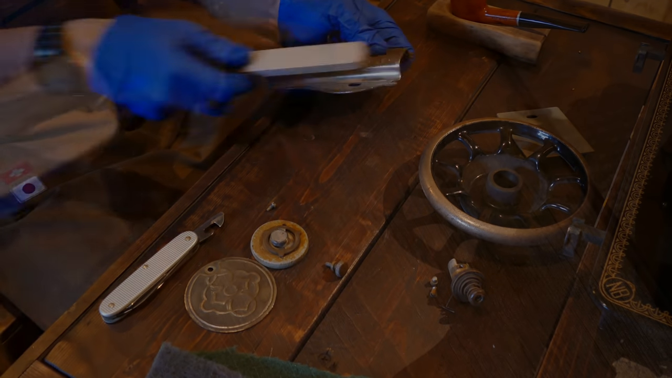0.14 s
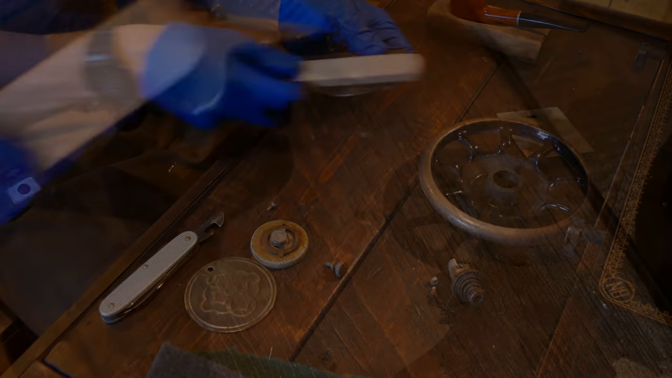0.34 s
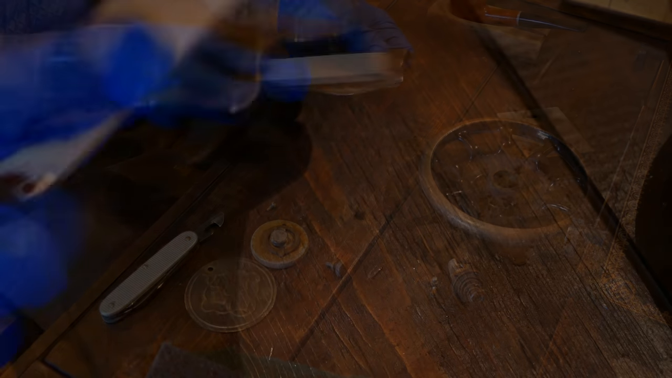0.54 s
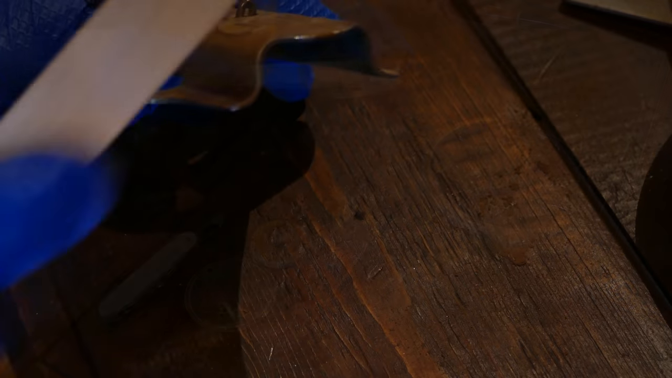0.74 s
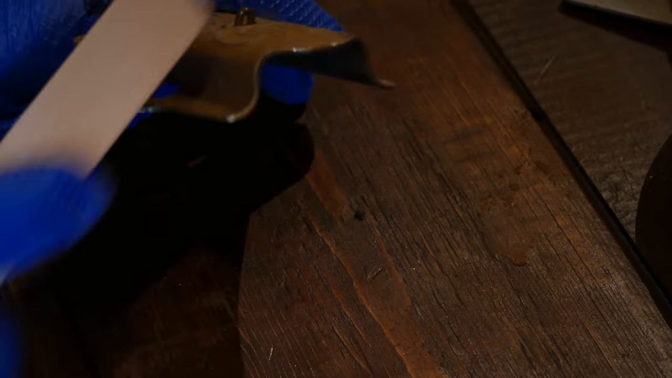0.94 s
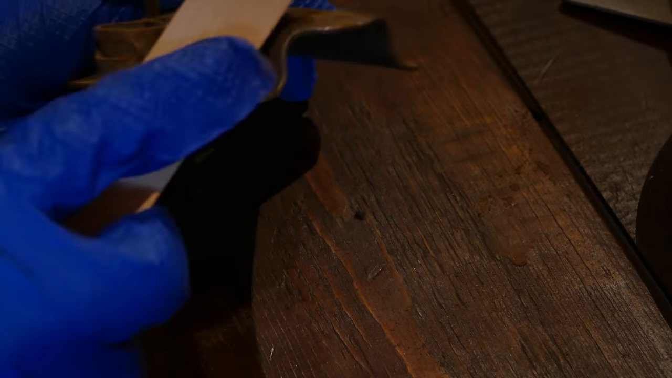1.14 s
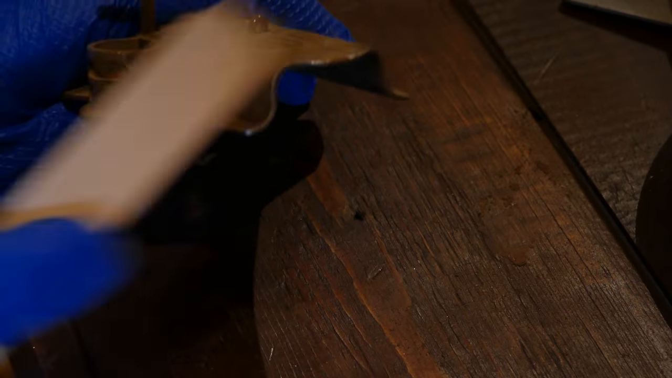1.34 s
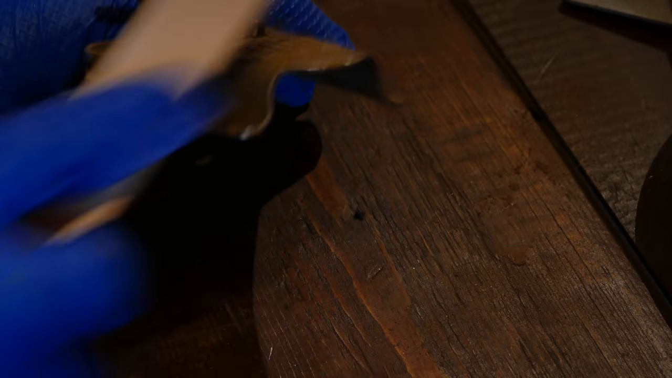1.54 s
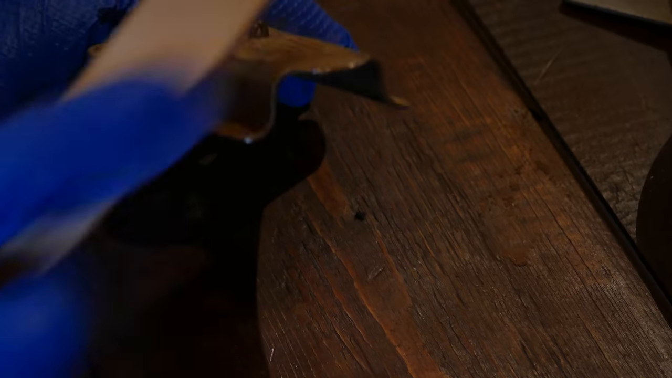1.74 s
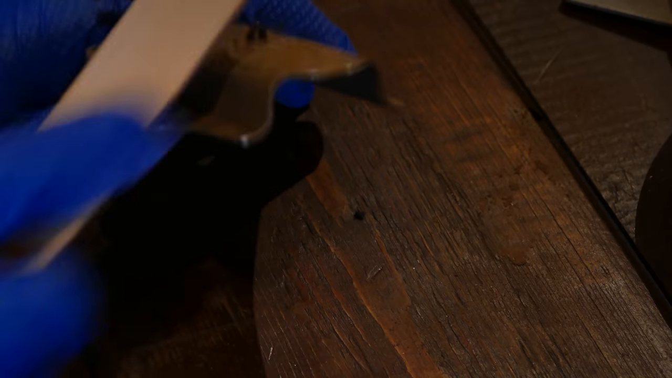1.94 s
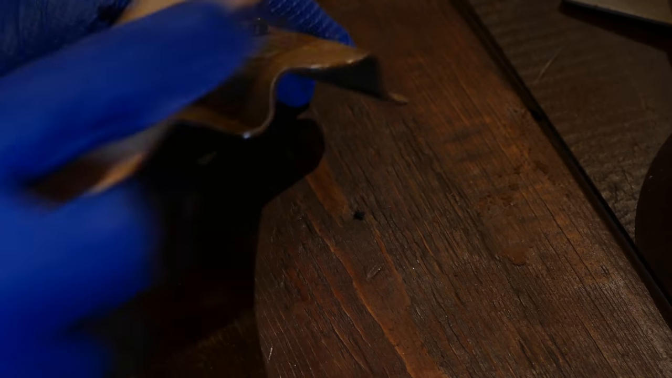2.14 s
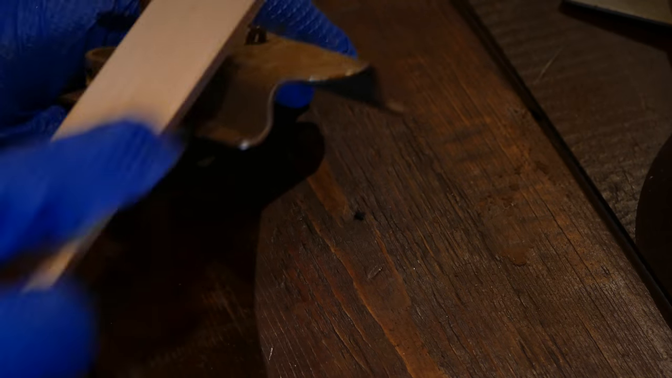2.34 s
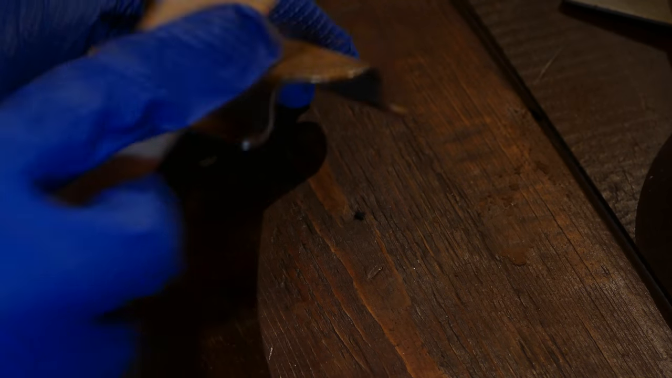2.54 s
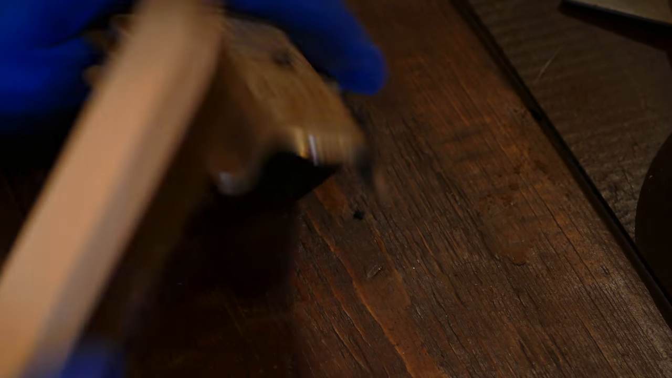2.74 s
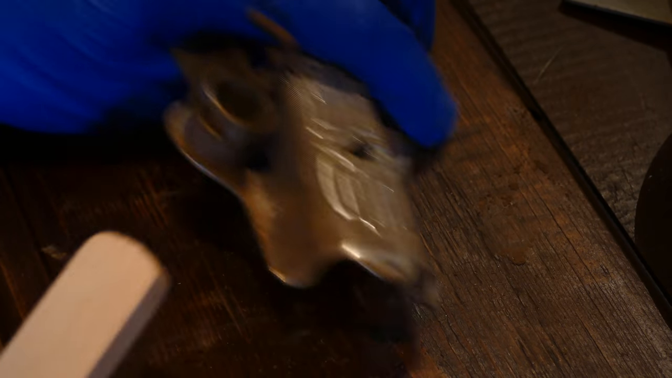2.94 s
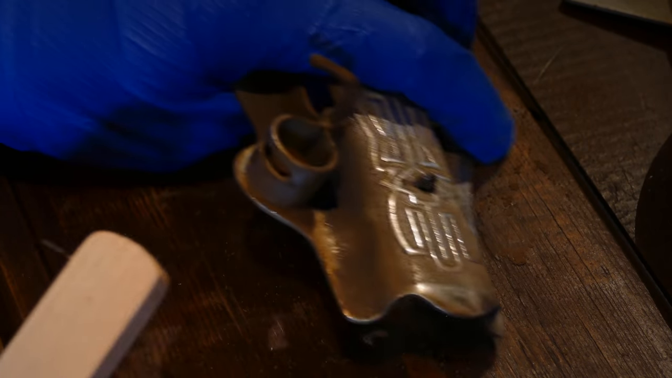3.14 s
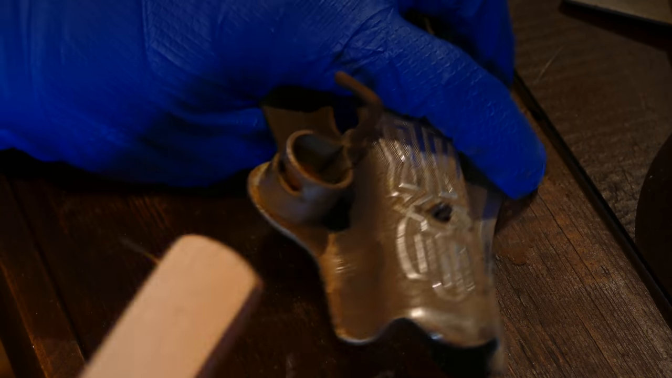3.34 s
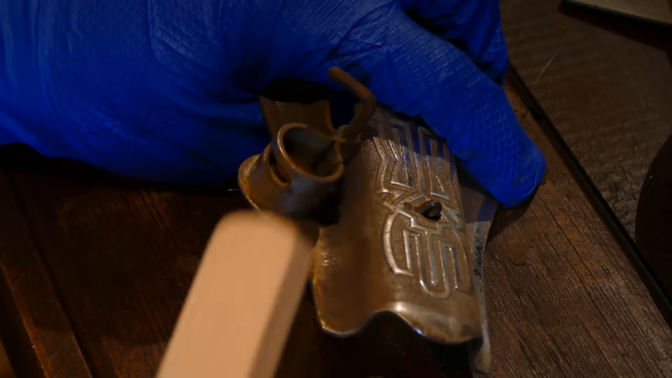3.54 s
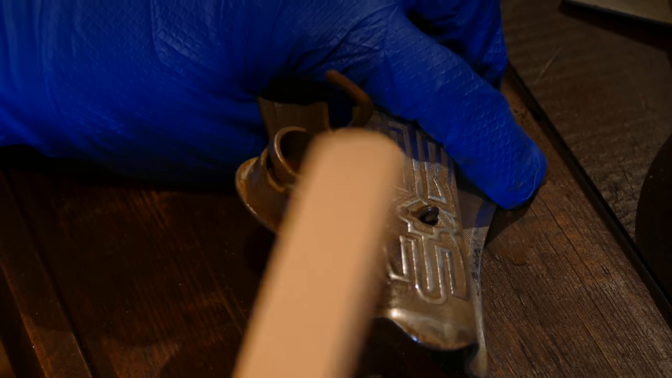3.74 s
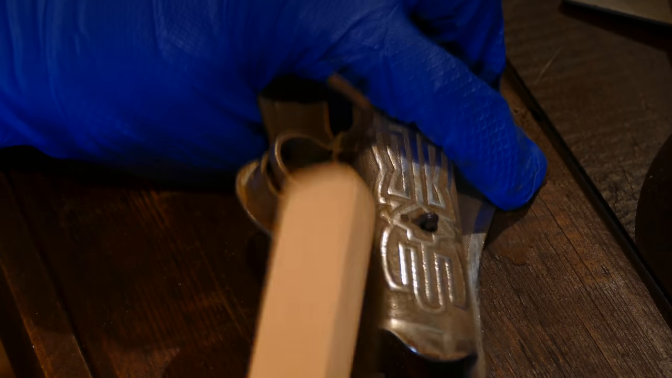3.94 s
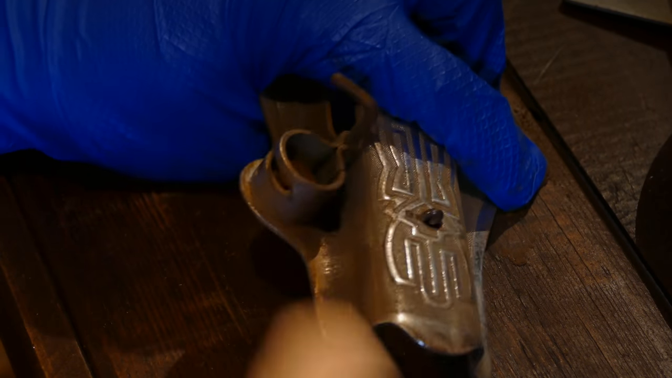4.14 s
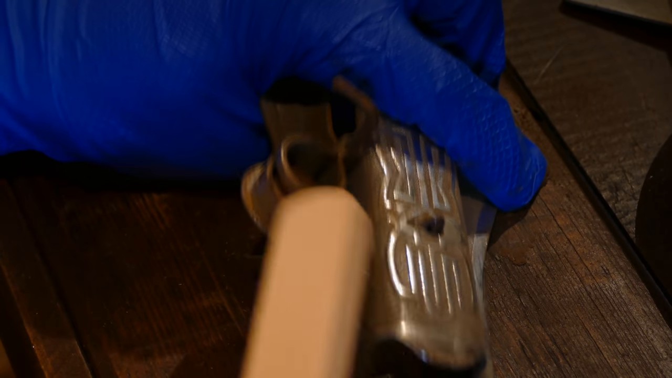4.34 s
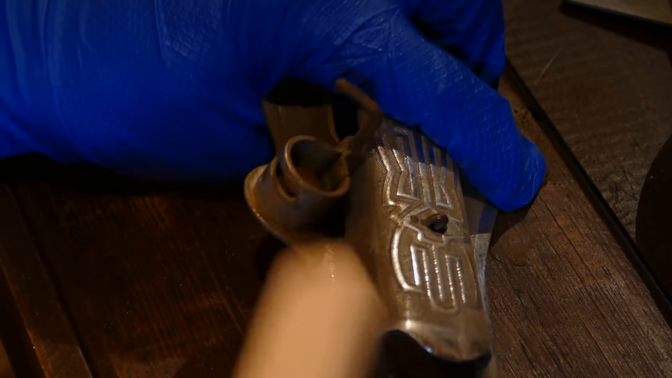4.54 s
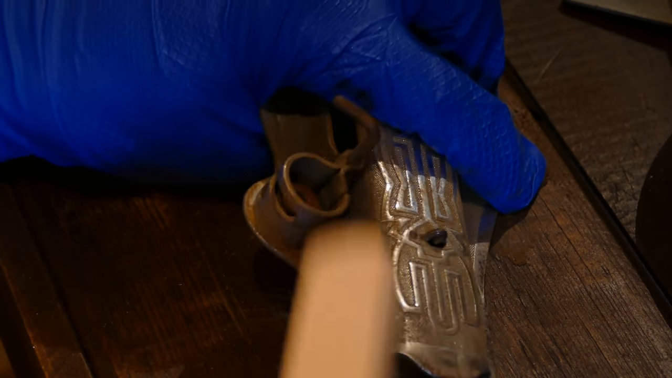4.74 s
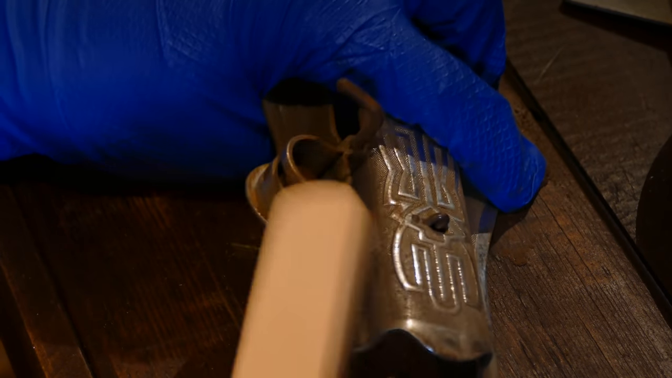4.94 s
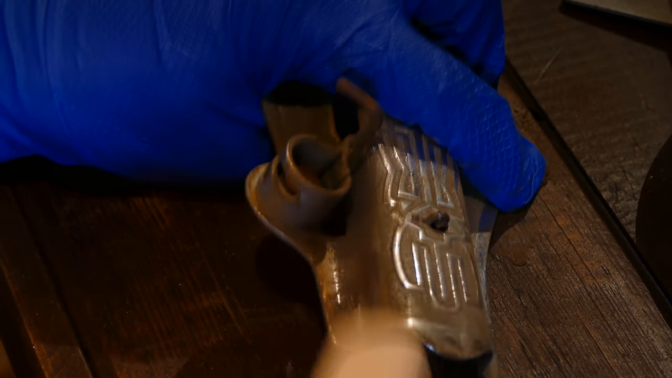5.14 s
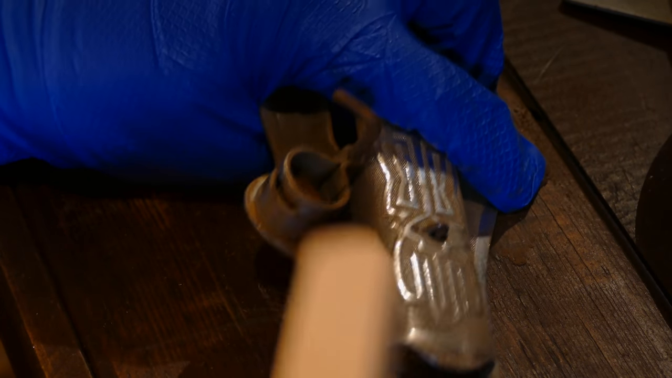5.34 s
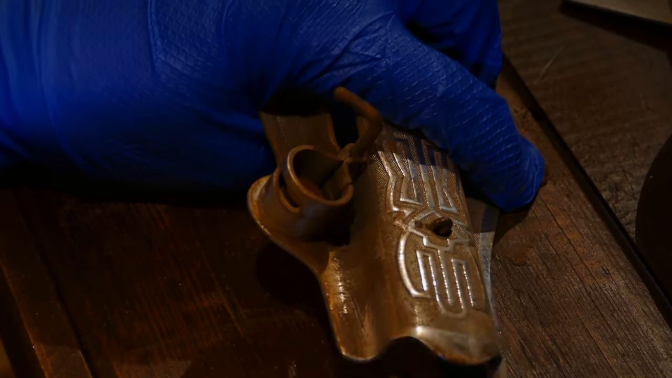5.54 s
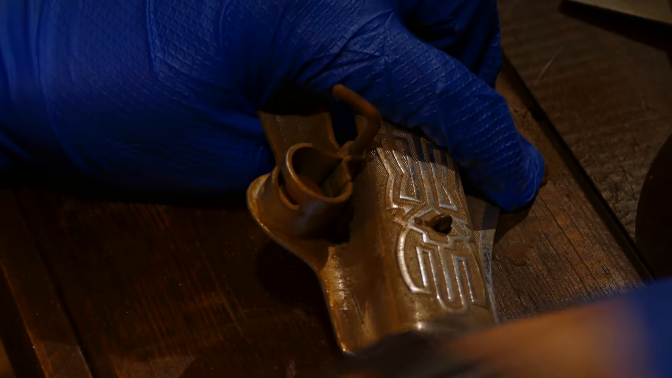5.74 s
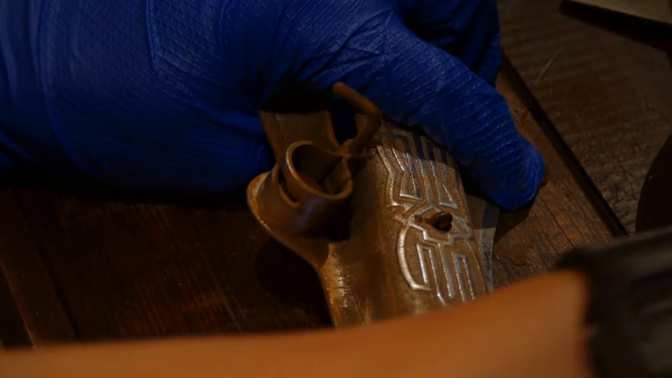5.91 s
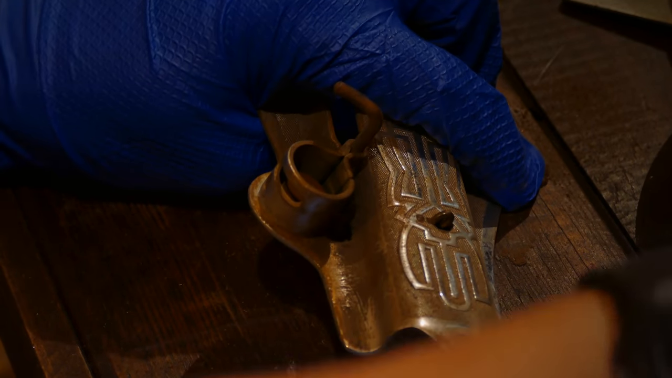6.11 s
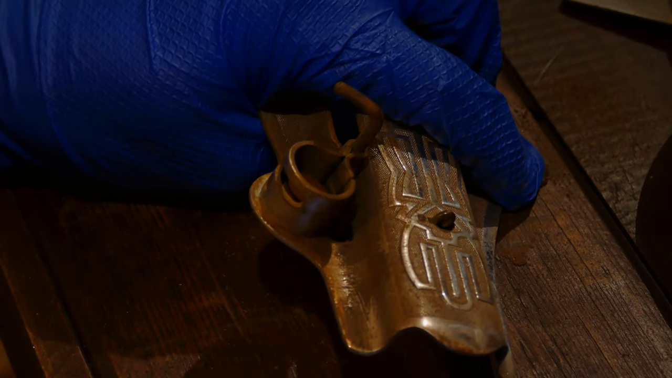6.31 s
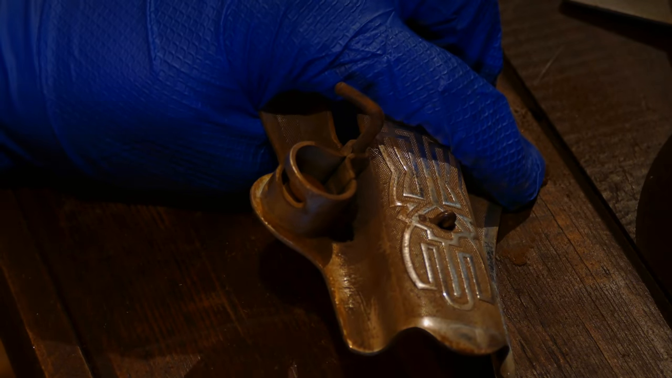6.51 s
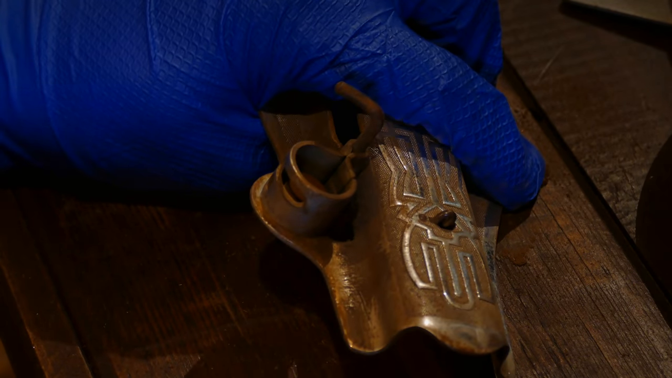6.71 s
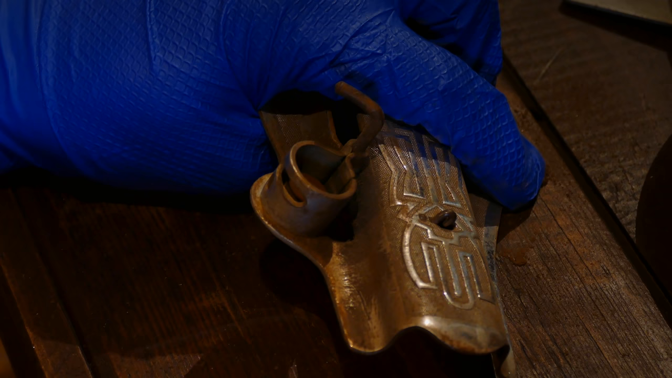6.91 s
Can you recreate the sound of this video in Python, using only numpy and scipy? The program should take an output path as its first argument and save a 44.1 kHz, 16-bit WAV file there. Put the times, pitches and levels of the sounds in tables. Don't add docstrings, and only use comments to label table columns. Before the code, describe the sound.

A wire brush scrubs a small metal cover in short raspy strokes, rubber gloves rustle, then a wooden handle knocks down loudly and small tools tick.

```python
import sys
import numpy as np
from scipy import signal
from scipy.fft import rfft, irfft, next_fast_len
from scipy.io import wavfile
from scipy.ndimage import uniform_filter1d

SR = 44100
rng = np.random.default_rng(int(sys.argv[2]) if len(sys.argv) > 2 else 0)


def persist_wave(psi):
    counts = np.round(np.clip(psi, -1, 1) * 32767).astype(np.int16)
    wavfile.write(sys.argv[1], SR, np.atleast_2d(counts).T)


def linear_from_db(decibels):
    return 10 ** (np.asarray(decibels, float) / 20)


N = 311787
T = np.arange(N) / SR
DECAY = np.log(1000)


def colour(x, points):
    size = next_fast_len(len(x))
    hz, db = np.transpose(points)
    f = np.log(np.arange(size // 2 + 1) * SR / size + 1)
    gain = linear_from_db(np.interp(f, np.log(hz), db))
    return irfft(rfft(x, size) * gain, size)[:len(x)]


def unit(x):
    return x / np.sqrt(np.mean(x ** 2))


def band(x, hz, width):
    return signal.lfilter(*signal.iirpeak(hz, hz / width, SR), x)


def cut(x, hz, kind):
    return signal.sosfilt(signal.butter(4, hz, kind, fs=SR, output="sos"), x)


def walk(rate):
    k = int(SR / rate)
    held = np.repeat(rng.standard_normal(N // k + 1), k)
    return 1.2 * uniform_filter1d(held, k)[:N]


def slips(rate, scatter_db):
    scatter = linear_from_db(scatter_db * np.minimum(rng.exponential(size=N), 3))
    size = scatter * rng.standard_normal(N)
    return unit(size * (rng.random(N) < rate / SR))


def ring(modes, rise, clatter):
    hz, db, t60 = np.transpose(modes)[:, :, None]
    t = T[:SR // (3 if t60.max() > .12 else 9)]
    fade = linear_from_db(db) * np.exp(-DECAY * t / t60)
    noises = rng.standard_normal(fade.shape)
    dense = np.array([unit(band(band(n, f, 0.71 * f), f, 0.71 * f)) for n, f in zip(noises, hz[:, 0])])
    onset = 1 - np.exp(-(t / rise) ** 2)
    y = (fade * (np.sin(2 * np.pi * hz * t) + clatter * dense)).sum(axis=0) * onset
    return y / np.abs(y).max()


def add(out, s, db, y):
    i = int(s * SR)
    out[i:i + len(y)] += linear_from_db(db) * y[:N - i]


def swells(rows):
    s, rise, fall, db = np.transpose(rows)[:, :, None]
    t = T[::64]
    away = np.maximum((s - t) / np.maximum(rise, 1e-3), (t - s) / np.maximum(fall, 1e-3))
    level = linear_from_db(db - 19 * np.minimum(away, 5))
    return np.interp(T, t, np.sqrt((level ** 2).sum(axis=0)))


# frequency in Hz, level in dB per Hz.
NOISE_MID = [(25, -22), (100, -10), (250, -2), (600, 0), (1200, -3), (2100, -5), (3000, -10), (5000, -13),
             (8000, -15), (14500, -11), (16000, -14)]
# frequency in Hz, level in dB per Hz.
NOISE_SIDE = [(25, -16), (150, -5), (400, -0.5), (1000, -3.5), (2500, -9.5), (8000, -13), (16000, -15)]
# loudest moment in seconds, level in dB.
RUMBLE = [(.05, -71), (.45, -63.5), (1.12, -60.5), (1.69, -62.5), (2.1, -65), (2.6, -71), (4.09, -63.5),
          (4.94, -63), (6.14, -64.5), (7.0, -70)]
# start in seconds, level in dB, frequency in Hz, decay T60 in seconds.
BOOMS = [(0.929, -50.5, 99, 0.14), (1.70, -50, 86.3, 0.58), (1.701, -40, 198, 0.17), (4.9, -56, 90.6, 0.2),
         (6.091, -42.5, 180, .25), (2.17, -59, 191, 0.22), (2.42, -55.5, 170, .2), (2.79, -52, 202, 0.19),
         (3.97, -46, 171, 0.21)]


def room_noise():
    mid = unit(colour(rng.standard_normal(N), NOISE_MID))
    side = unit(colour(rng.standard_normal(N), NOISE_SIDE)) * linear_from_db(-5.5)
    swell = linear_from_db(-57 + 0.83 * walk(2.5))
    rumble = band(rng.standard_normal(N), 112, 82) + 1.34 * band(rng.standard_normal(N), 192, 25)
    rise_s, fall_s, building_db = .4, 0.44, -77.5
    rumble = unit(rumble) * (linear_from_db(building_db) + swells([(s, rise_s, fall_s, db) for s, db in RUMBLE]))
    for s, db, hz, t60 in BOOMS:
        add(rumble, s, db, ring([(hz, 0, t60)], rise=0.011, clatter=0.2))
    return np.array([mid + side, mid - side]) * swell + rumble


def strokes(rows):
    bend_db, bend_s = -10, 0.046
    catch_db, catch_s = -1.5, 0.0046
    lift_db_per_s = -580
    tips_db = -17, -3
    t = T[::32]
    scrub, tips = np.zeros((2, len(t)))
    for lands, full, lifts, full_db, lift_db in rows:
        turning = scrub[max(int(lands * SR) // 32, 0)] > 1e-3
        bend = 0 if turning else np.clip((full - lands) / bend_s, 0, 1.3)
        bent_db = full_db + bend_db * bend
        db = np.interp(t, (lands, full, lifts), (bent_db, full_db, lift_db))
        db = db + lift_db_per_s * np.clip(t - lifts, 0, .25)
        catch = linear_from_db(bent_db - bend_db + catch_db) * np.exp(-np.clip(t - lands, 0, .1) / catch_s)
        gain = linear_from_db(db) + catch
        scrub = np.where(t >= lands, gain, scrub)
        tips = np.where(t >= lands, gain * linear_from_db(np.interp(t, (lands, lifts), tips_db)), tips)
    return np.interp(T, t, scrub), np.interp(T, t, tips)


# landing, full speed and lift in seconds,
# level at full speed in dB, level at lift in dB.
HELD_STROKES = [
    (-.1, -.05, 0.014, -44, -47.5),
    (.214, .29, .376, -39.5, -34),
    (.377, .47, 0.54, -48, -39),
    (.92, 1.02, 1.194, -39, -43),
    (1.472, 1.514, 1.637, -40, -39.5),
    (1.911, 1.94, 2.088, -42.5, -41),
    (2.342, 2.37, 2.535, -46, -41),
]
PRESSED_STROKES = [
    (3.968, 4.016, 4.097, -44, -40),
    (4.364, 4.428, 4.508, -42.5, -40),
    (4.712, 4.76, 4.85, -45, -37.5),
    (5.032, 5.07, 5.165, -47.5, -41.5),
    (5.33, 5.385, 5.415, -44, -44),
]
# loudest moment, rise and fall in seconds, level in dB.
HELD_HUM = [(.39, .02, 0.51, -54.5), (.96, .03, .08, -54), (1.128, 0.2, 0.16, -45.5),
            (1.625, 0.046, 0.045, -47), (2.07, 0.09, .07, -49), (2.48, .08, 0.085, -46)]
PRESSED_HUM = [(3.975, .02, 0.18, -42), (4.369, 0.011, 0.23, -46), (4.726, .02, 0.18, -38.5),
               (4.862, .08, 0.068, -45), (5.04, 0.019, 0.22, -44.5), (5.34, 0.022, 0.14, -46)]
# frequency in Hz, bandwidth in Hz, level in dB.
HELD_PLATE = [(2065, 170, -0.5), (2770, 380, -5.5), (3500, 690, 1), (4310, 950, 0.5), (5360, 410, -2),
              (6440, 450, -3.5), (7440, 390, -3), (8600, 300, -9), (11000, 250, -16.5)]
PRESSED_PLATE = [(1880, 150, 4.5), (2880, 220, 3.5), (3420, 260, 6.5), (4730, 1400, 6), (6500, 400, -11),
                 (7300, 500, 3), (8640, 270, -3)]
# frequency in Hz, level in dB per Hz.
BRISTLE = [(88, -40), (150, 7.5), (270, -10), (396, -9), (494, -2.5), (1990, -6), (2870, -20.5),
           (3580, -4.5), (12000, -14.5), (15600, -44), (22000, -120)]


def brush(rows, pushes, plate, bench_hz, ring_db, lowest_db):
    slip = slips(14000, scatter_db=1.0)
    (low_hz, low_width, _), *upper = plate
    rings = sum(linear_from_db(db + 4.9 * walk(14)) * unit(band(slip, hz, w)) for hz, w, db in upper)
    scrub = unit(unit(colour(slip, BRISTLE)) + linear_from_db(ring_db) * unit(rings)) * linear_from_db(2.3 * walk(45))
    tips = unit(cut(slips(12000, scatter_db=2.0), 9000, "high")) * linear_from_db(-2.0)
    hum = unit(band(band(slips(1500, scatter_db=1.0), bench_hz, 110), bench_hz, 143))
    hum = hum * linear_from_db(2.3 * walk(30) - 4)
    lowest = unit(band(slip, low_hz, low_width)) * linear_from_db(lowest_db + 2.8 * walk(25.02))
    speed, sizzle = strokes(rows)
    return (scrub + lowest) * speed + tips * sizzle + hum * swells(pushes)


# frequency in Hz, side minus mid in dB.
WIDTH = [(200, -24), (1500, -24), (2500, -21), (4400, -10), (8000, -5), (15000, -5)]


def bench_reflections(near):
    scatter = rng.standard_normal(size=221) * np.exp(-np.abs(np.arange(-110, 111)) / 45)
    scatter = scatter - scatter[::-1]
    side = colour(np.convolve(near, scatter / np.linalg.norm(scatter), "same"), WIDTH)
    return np.array([near + side, near - side])


# centre frequency in Hz, decay T60 in seconds, level in dB.
ROOM = [(292, 0.21, -17.5), (1020, 0.29, -13.5), (2530, 0.25, -20), (5000, 0.23, -23), (10000, .07, -36)]


def room(x):
    t = T[:SR // 2]
    build_up = 1 - np.exp(-t / 0.0038)
    tails = 0
    for hz, t60, db in ROOM:
        noise = np.array([unit(band(n, hz, hz)) for n in rng.standard_normal((2, len(t)))])
        level = linear_from_db(db) * np.sqrt(2 * DECAY / t60 / SR)
        tails = tails + level * np.exp(-DECAY * t / t60) * build_up * noise
    mid, side = signal.fftconvolve(x[None], tails, axes=1)[:, :N]
    return np.array([mid + .18 * side, mid - 0.12 * side])


# moment in seconds, peak in dB, favoured frequency in Hz,
# brightness in dB per octave, upper favoured frequency in Hz.
LANDINGS = [(0.21, -28.5, 2830, 0, 6350), (0.2433, -31, 2880, -8, 6270), (0.5212, -29, 1880, -7, 5400),
            (0.7542, -40.5, 3410, -3, 4470), (0.84, -43, 3730, -5, 4500), (0.9138, -18, 3360, -12, 6270),
            (1.4654, -26.5, 3500, -16, 6560), (1.9046, -26, 2090, -4, 4500),
            (1.9355, -34.5, 3660, -7, 5440), (2.3376, -35, 2050, -21, 5470), (2.7107, -41, 3970, -3, 4000),
            (2.8192, -37, 1710, -10, 4140), (2.8737, -36.5, 2510, -5, 4500), (3.9607, -9, 3420, -7.5, 5160),
            (4.0906, -24.5, 4040, 6, 3980), (4.358, -23.5, 3600, -8, 4400), (4.7051, -21, 1930, -3, 7440),
            (4.8447, -25.5, 3410, 7, 8500), (4.8654, -38, 1970, 1, 5290), (5.0256, -21.5, 1910, -3, 4300),
            (5.0689, -32, 2000, 0, 4790), (5.3238, -21, 1850, 2, 4440), (6.7047, -43, 1720, -27, 4600)]


def landings():
    out, t = np.zeros(N), T[:SR // 8]
    crowd = np.exp(-((t - .005) / 0.0024) ** 2)
    stragglers = 0.83 * (t > .003) * np.exp(-DECAY * (t - .003) / 0.037)
    for s, db, hz, tilt_db, upper_hz in LANDINGS:
        burst = rng.standard_normal(len(t)) * (crowd + stragglers)
        plate = HELD_PLATE if s < 3 else PRESSED_PLATE
        rings = sum(linear_from_db(d + tilt_db * np.log2(f / 3500)) * band(burst, f, w) for f, w, d in plate)
        y = .25 * unit(band(band(burst, 4100, 7000), 4100, 7000)) + unit(rings)
        y = y + 0.81 * unit(band(burst, hz, 200.4)) + 0.52 * unit(band(burst, upper_hz, 300))
        add(out, s - .003, db, y / np.abs(y).max())
    return out


# start in seconds, peak in dB, frequency in Hz.
THUDS = [(0.377, -32.5, 933), (0.939, -47, 345), (1.62, -43, 410), (1.7, -34.5, 345), (2.412, -42, 627),
         (2.811, -38, 503), (3.299, -44, 388), (3.915, -14.5, 384), (3.939, -29, 338), (3.989, -31, 320),
         (4.364, -35.5, 402), (4.72, -18.5, 398), (5.029, -32, 388), (5.325, -34, 650), (6.27, -37, 522),
         (6.526, -45, 345)]


def thuds():
    out = np.zeros(N)
    t60, over_db = 0.052, -1.5
    for s, db, hz in THUDS:
        modes = [(hz, 0, t60), (0.88 * hz, -3, t60), (1.687 * hz, over_db, 0.9 * t60),
                 (2.325 * hz, over_db - 2.0, 0.68 * t60), (3.1 * hz, over_db - 6, .7 * t60),
                 (4.3 * hz, over_db - 8.0, 0.71 * t60), (7 * hz, over_db - 15, 0.22 * t60)]
        add(out, s, db, ring(modes, rise=0.0004, clatter=0.46))
    return out


# loudest moment, rise and fall in seconds, level in dB, low rubbing above it in dB.
GLOVES = [(.755, 0.11, .045, -53.5, -2), (.838, .04, .04, -66, -20), (2.66, 0.092, 0.39, -55, -4),
          (2.875, 0.42, 0.047, -45, -10), (3.0, 0.0806, .4, -52, -12), (3.21, .08, 0.13, -57, -8),
          (3.31, 0.051, 0.41, -53, -4.5), (5.59, 0.14, 0.21, -50.5, -21), (5.84, .1, 0.12, -51, 2),
          (5.97, .07, 0.022, -55.5, -7), (6.702, 0.25, 0.32, -57.5, 8), (6.9, 0.066, 0.09, -52, 11.5)]
# frequency in Hz, level in dB per Hz.
GLOVE = [(1060, -6), (1800, -3.5), (3870, -7.5), (5210, -10), (8030, -16), (9620, -23.5), (15500, -33)]


def gloves():
    crackle = unit(colour(slips(5000, scatter_db=2.0), GLOVE)) * linear_from_db(2.0 * walk(35))
    rub = unit(band(band(rng.standard_normal(N), 534, 540), 590, 680)) * linear_from_db(1.4 * walk(25) - 4.0)
    crackle_gain = swells([row[:4] for row in GLOVES])
    rub_gain = swells([(s, rise, fall, db + rub_db) for s, rise, fall, db, rub_db in GLOVES])
    return crackle * crackle_gain + rub * rub_gain


# moment in seconds, peak in dB.
FLAT_AT = (5.9935, -4.5)
END_AT = (6.0912, 0.3)
# frequency in Hz, level in dB,
# decay T60 in seconds.
FLAT = [(520, -2, .048), (706, -7.5, 0.043), (400, -29, 0.068), (1086, -9, .04), (1447, -10.5, 0.043),
        (2240, -13.5, 0.022), (2990, -13.5, 0.028), (3830, -14.5, 0.023)]
END = [(426, -17.5, 0.084), (723, -14.5, 0.11), (892, -11.5, 0.072), (1254, -18, .05), (1740, -5.5, 0.023),
       (1946, 8, 0.019), (2410, -2.5, 0.021), (3160, -6, 0.029), (3804, -8.5, 0.037), (5570, -16, 0.023),
       (7800, -19, 0.014)]
BENCH = [(400, -5, .2), (850, -1, .2), (1500, -1, .24), (2400, 0, .22), (3800, 1.5, .22), (6000, -18, .15)]


def handle_knocks():
    out = np.zeros(N)
    add(out, *FLAT_AT, ring(FLAT + [(5540, -25, .015), (8000, -37, .01)], rise=0.00032, clatter=0.35))
    add(out, *END_AT, ring(END + [(11000, -29.5, .008)], rise=0.00021, clatter=0.6))
    add(out, FLAT_AT[0], FLAT_AT[1] - 24, cut(ring(BENCH, rise=0.0027, clatter=4), 4800, "low"))
    add(out, END_AT[0], END_AT[1] - 14, cut(ring(BENCH, rise=0.0024, clatter=4), 5400, "low"))
    return out


# start in seconds, peak in dB, brightness in dB per octave,
# decay T60 in seconds.
TAPS = [
    (6.627, -33.5, -3.5, 0.04),
    (6.861, -21, 5.5, 0.025),
    (6.887, -22.5, 1, 0.022),
    (6.907, -26, 0, 0.018),
    (6.988, -27.5, 1, 0.022),
    (7.053, -25, -2.5, 0.028),
]
# frequency in Hz, level in dB, free decay T60 in seconds (each tap sets its own).
TOOL = [(398, -10, 0.18), (687, -3.5, 0.29), (1224, 3.5, 0.025), (2056, 0.5, 0.063), (2840, -11, 0.088),
        (3784, -16, 0.1)]


def tool_ticks():
    out = np.zeros(N)
    for s, db, tilt_db, t60 in TAPS:
        modes = [(f, d + tilt_db * np.log2(f / 1200), t60) for f, d, _ in TOOL]
        add(out, s, db, ring(modes, rise=.0001, clatter=0.43))
    return out


def scene():
    near = brush(HELD_STROKES, HELD_HUM, HELD_PLATE, bench_hz=380, ring_db=8.0, lowest_db=-11.5)
    near = near + brush(PRESSED_STROKES, PRESSED_HUM, PRESSED_PLATE, bench_hz=349, ring_db=-1.0, lowest_db=-10)
    near = near + landings() + thuds() + gloves() + handle_knocks() + tool_ticks()
    near = cut(near, 284, "high")
    both = bench_reflections(near) + room(near) + room_noise()
    lean_db = -2.5
    low = signal.lfilter(*signal.butter(1, 3000, fs=SR), both)
    return both + low * (linear_from_db(np.array([[lean_db], [-lean_db]]) / 2) - 1)


def top_cut(x):
    return signal.sosfilt(signal.butter(12, 16670, fs=SR, output="sos"), x)


def record(dry):
    loud = np.maximum(uniform_filter1d(np.abs(dry).max(axis=0), size=441) - .06, 0)
    attack, release = np.exp(-1 / (.04 * SR)), np.exp(-1 / (.6 * SR))
    poles = np.convolve([1, -attack], [1, -release])
    held = signal.lfilter([(1 - attack) * (1 - release)], poles, loud)
    mix = np.clip(dry / (1 + 110 * held), -1, 1)
    return top_cut(mix)


dry = scene()
out = record(dry)
persist_wave(out)
```